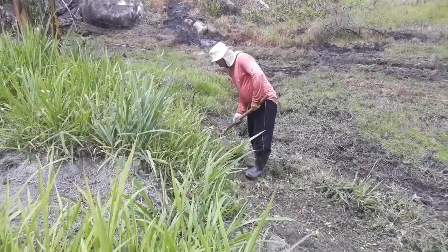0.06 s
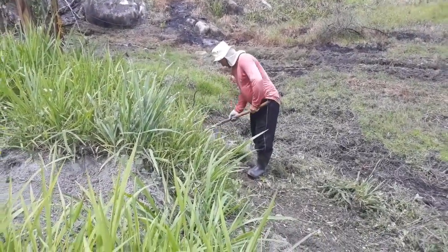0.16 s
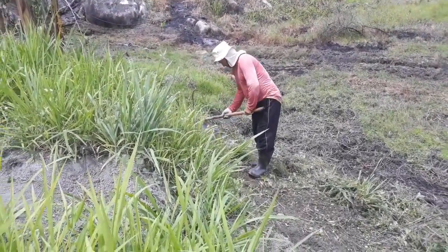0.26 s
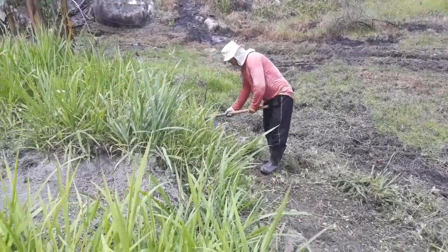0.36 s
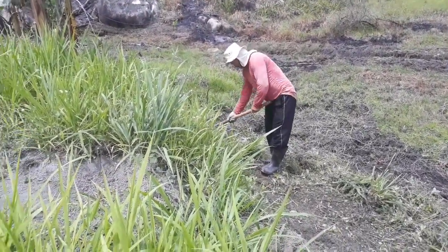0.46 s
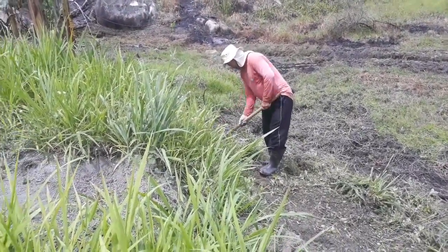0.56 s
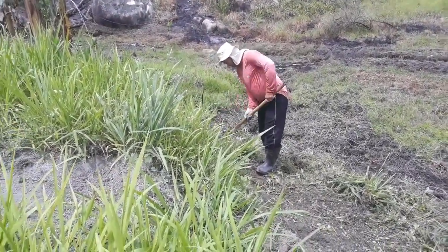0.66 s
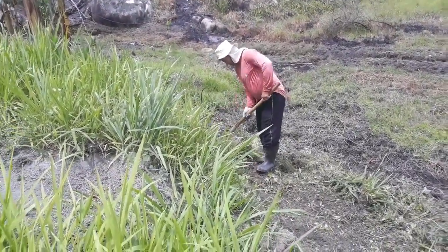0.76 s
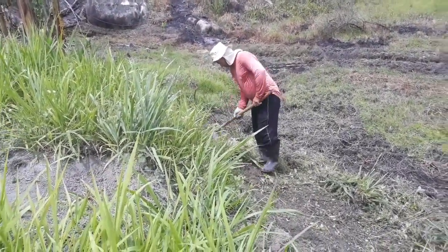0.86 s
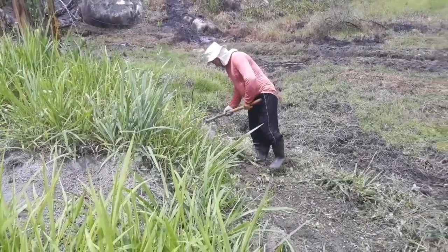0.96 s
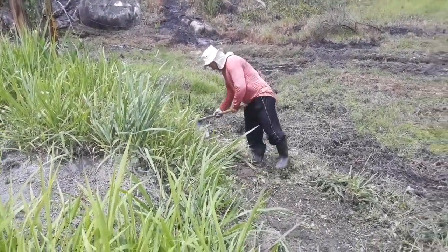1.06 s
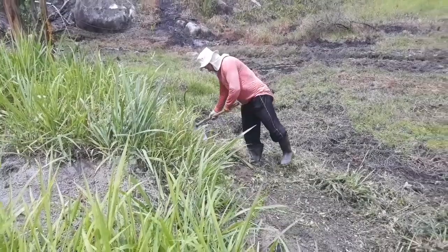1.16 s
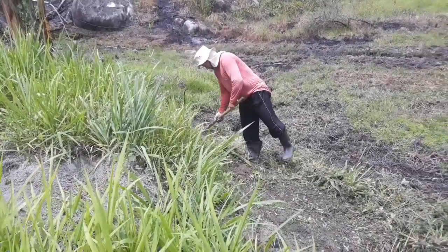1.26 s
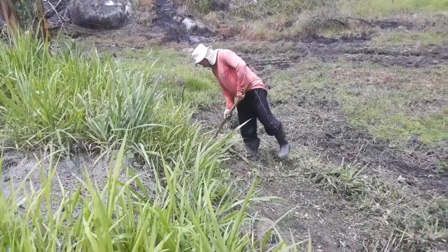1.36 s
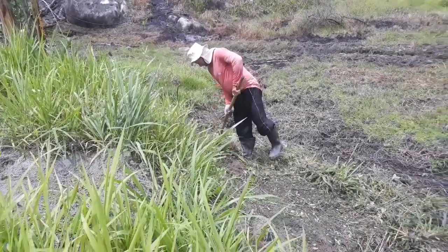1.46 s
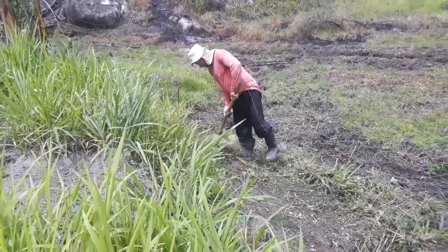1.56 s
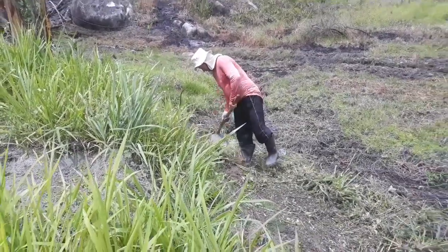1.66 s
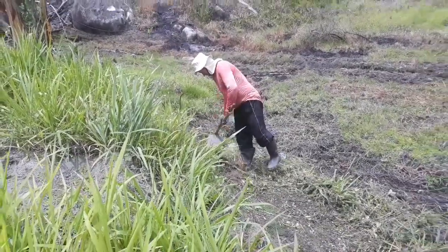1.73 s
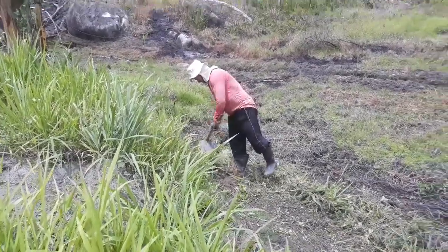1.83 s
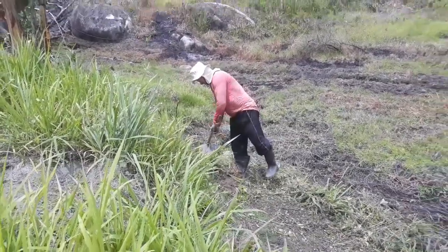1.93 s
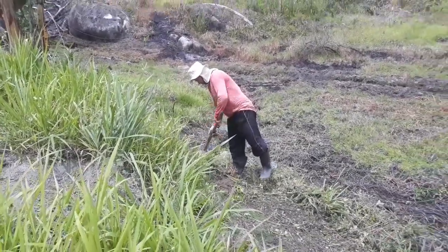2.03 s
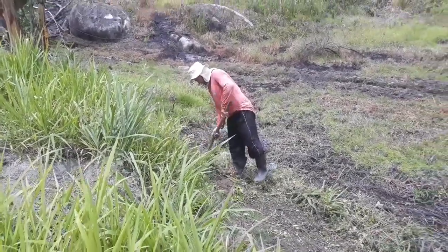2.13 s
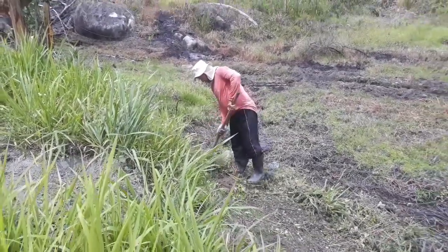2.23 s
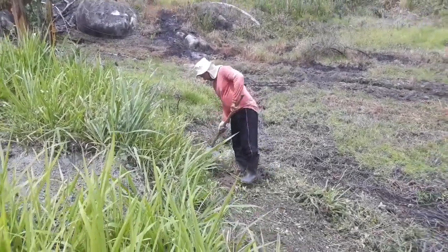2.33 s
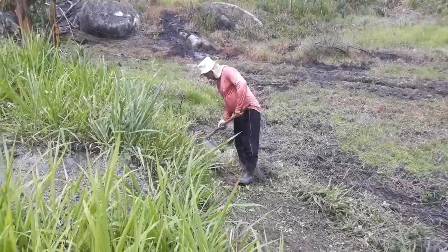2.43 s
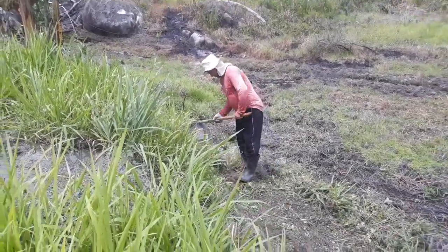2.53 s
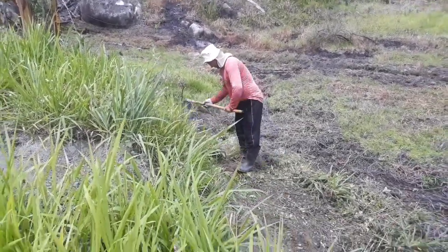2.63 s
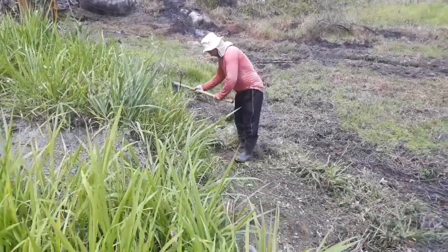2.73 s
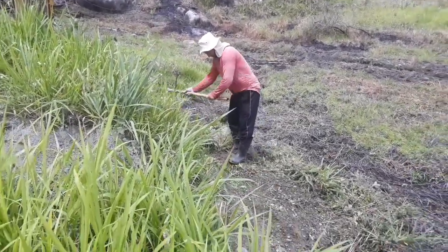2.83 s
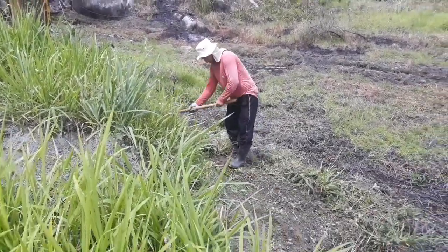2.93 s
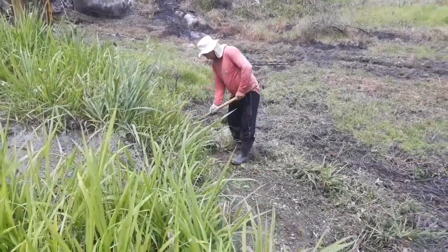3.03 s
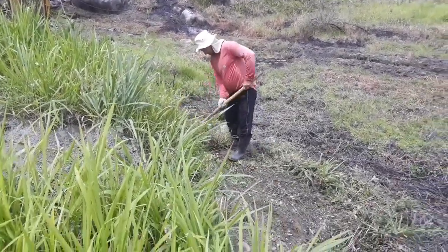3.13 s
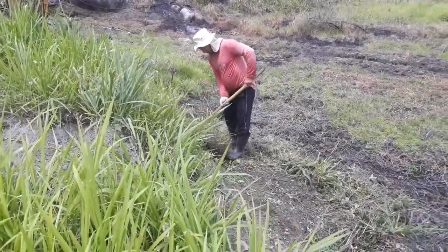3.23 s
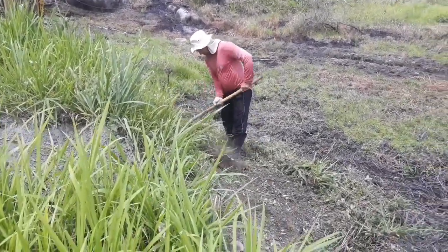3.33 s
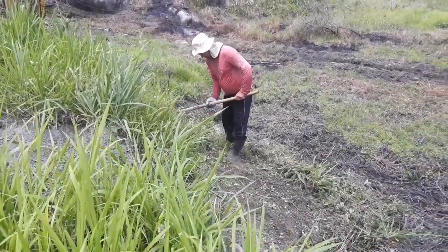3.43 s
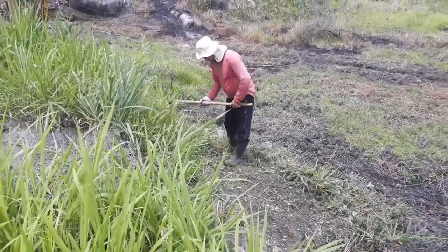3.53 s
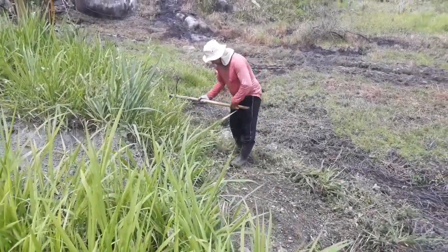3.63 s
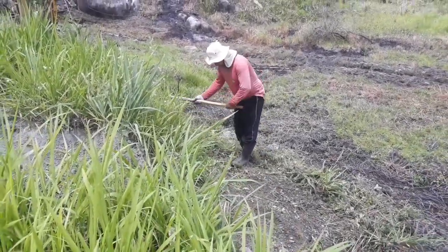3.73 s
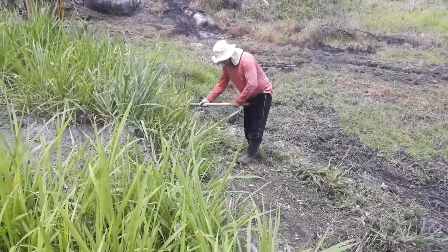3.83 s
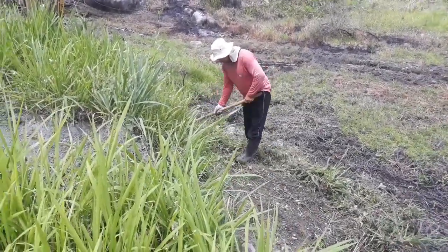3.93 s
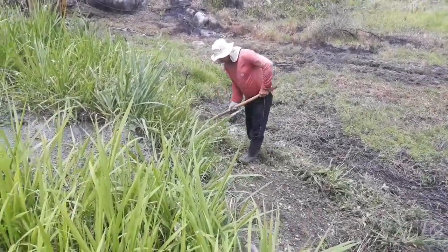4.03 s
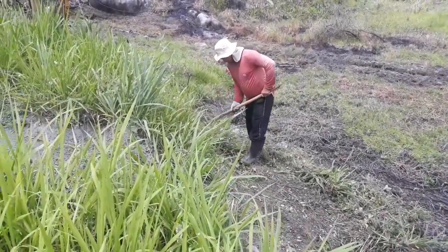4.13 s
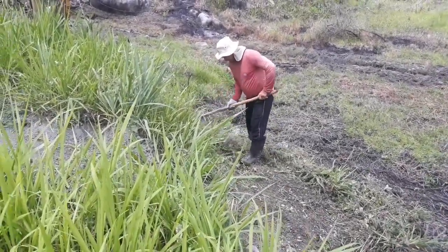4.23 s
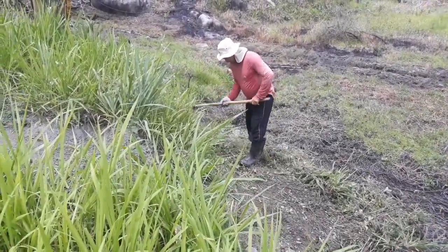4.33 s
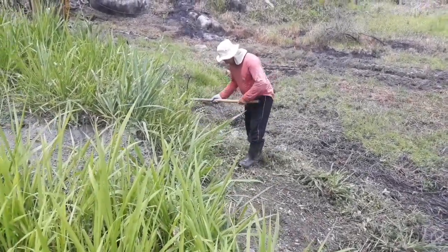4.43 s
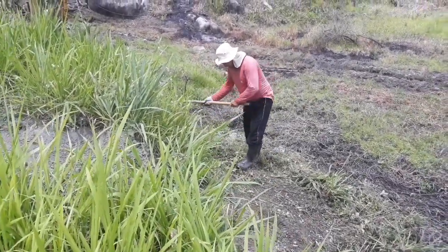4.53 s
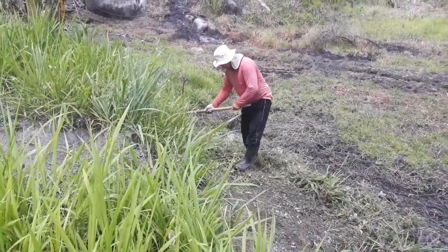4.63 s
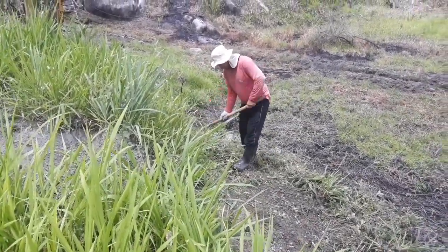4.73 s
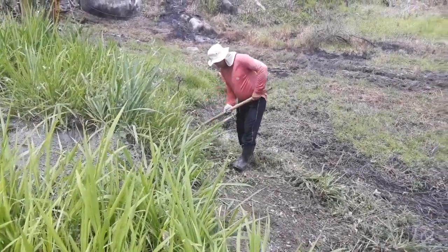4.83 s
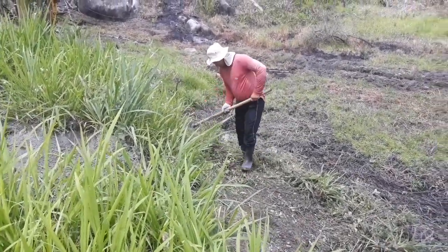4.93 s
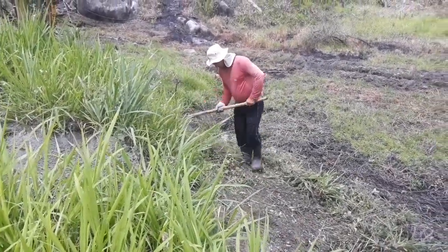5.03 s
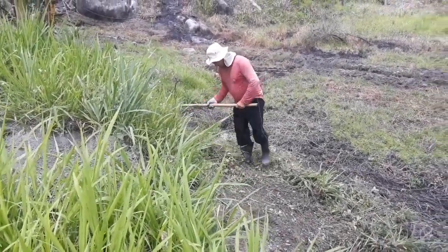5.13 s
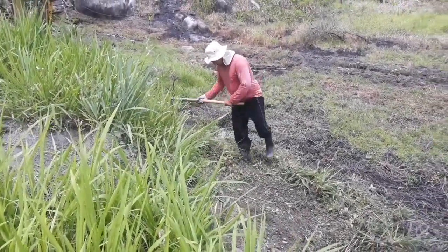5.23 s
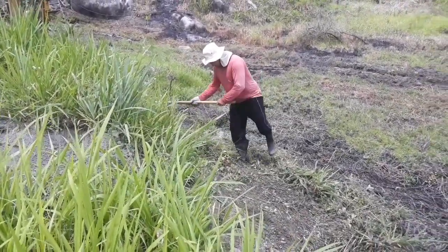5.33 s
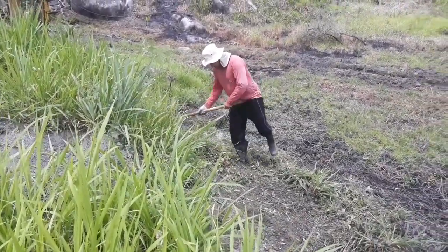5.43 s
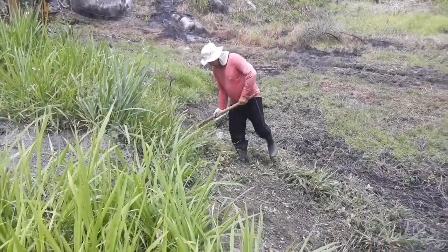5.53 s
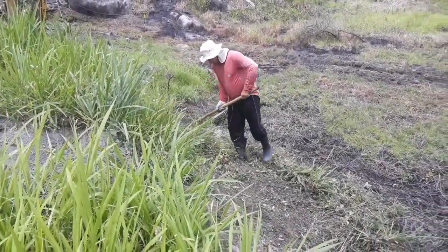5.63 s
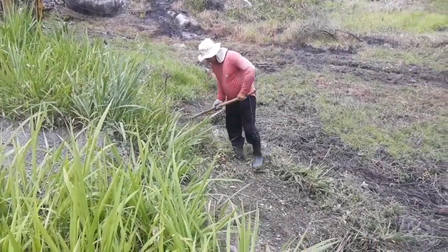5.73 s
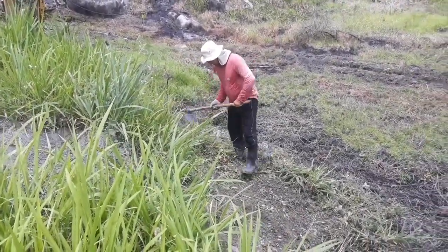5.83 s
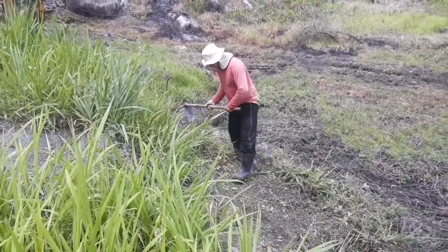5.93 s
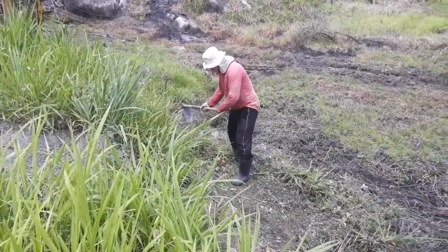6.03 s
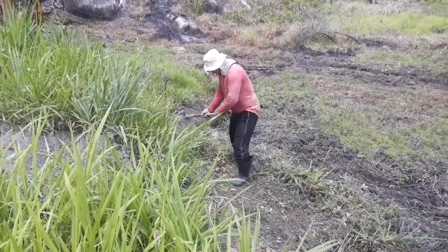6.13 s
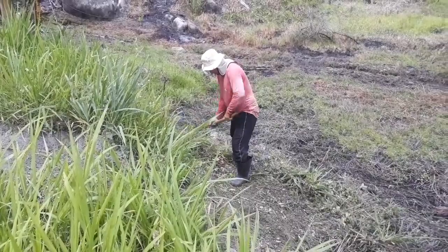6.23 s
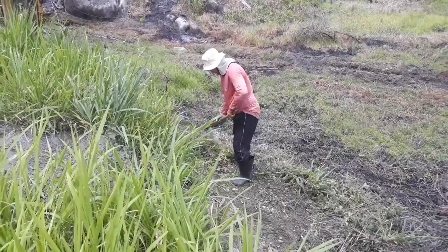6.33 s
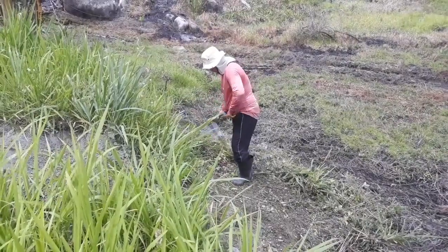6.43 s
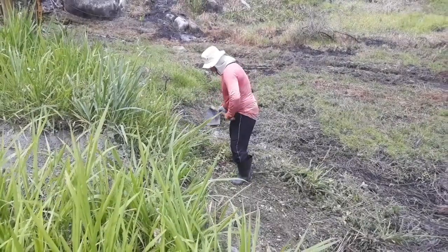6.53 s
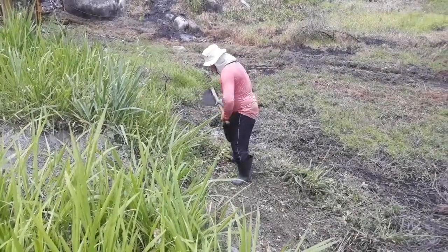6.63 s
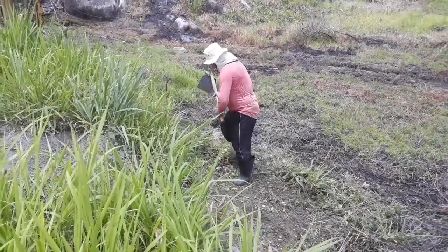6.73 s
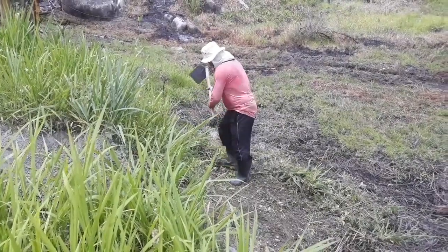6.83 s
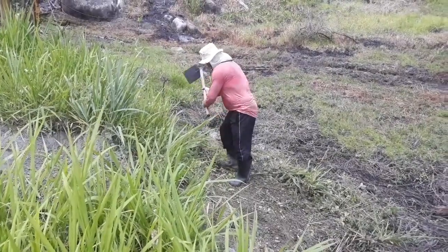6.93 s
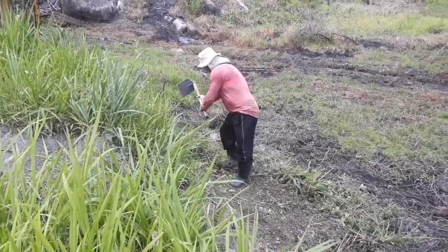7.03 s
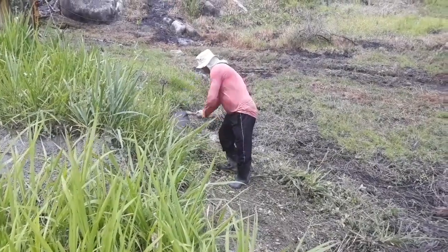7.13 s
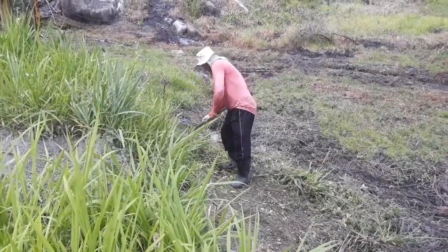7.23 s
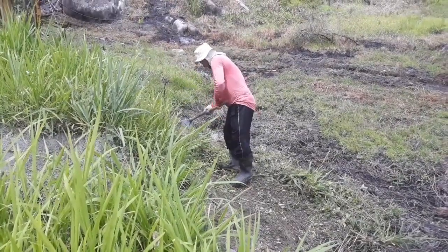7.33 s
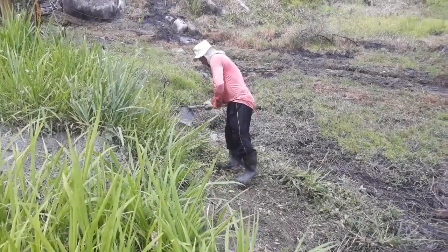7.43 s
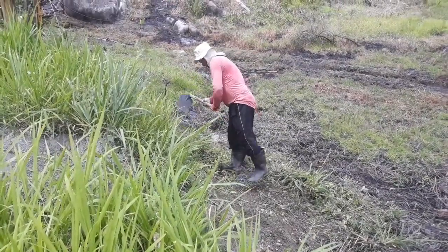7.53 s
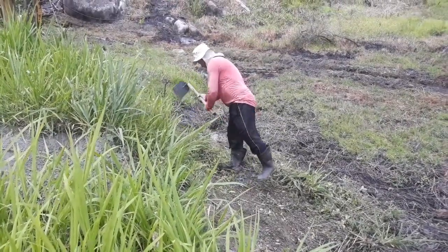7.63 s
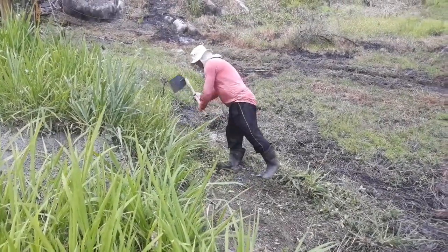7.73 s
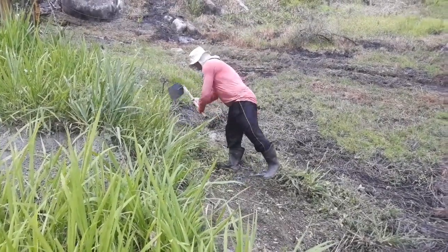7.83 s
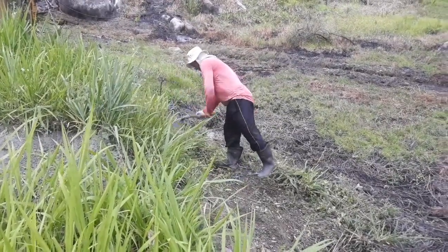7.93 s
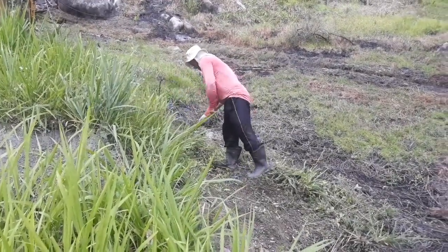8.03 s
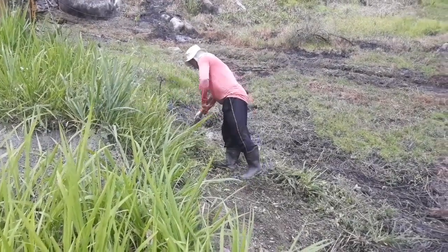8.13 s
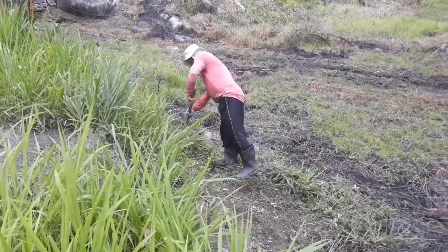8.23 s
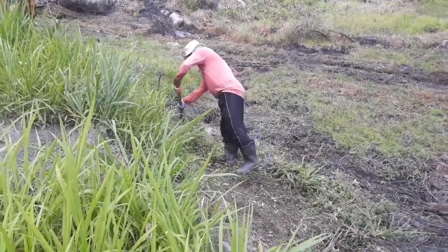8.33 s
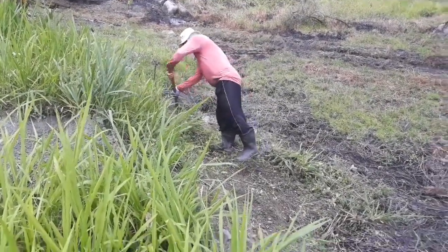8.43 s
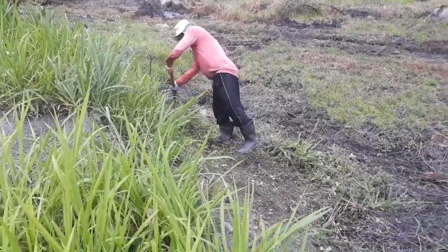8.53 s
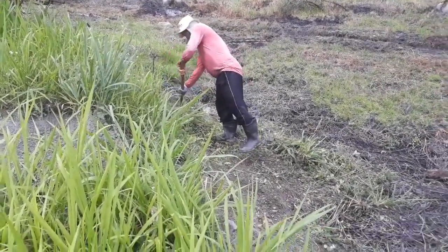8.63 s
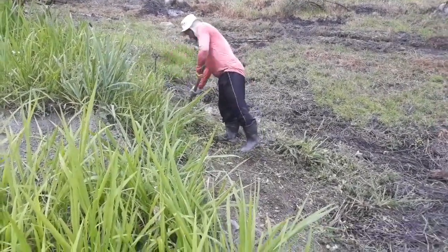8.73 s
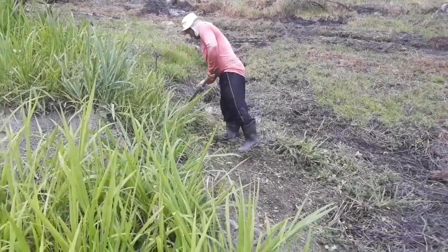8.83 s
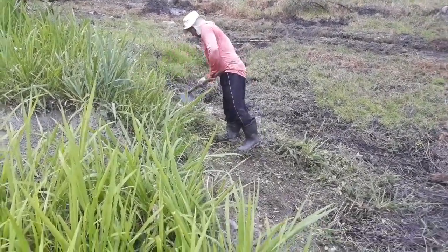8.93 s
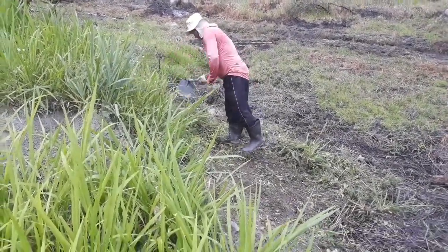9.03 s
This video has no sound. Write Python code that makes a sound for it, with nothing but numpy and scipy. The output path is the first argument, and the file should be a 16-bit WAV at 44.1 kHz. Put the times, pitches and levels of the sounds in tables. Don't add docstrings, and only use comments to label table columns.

```python
import sys
import numpy as np
from scipy import signal
from scipy.fft import rfft, irfft
from scipy.io import wavfile
from scipy.ndimage import uniform_filter1d, map_coordinates

SR = 44100
rng = np.random.default_rng(int(sys.argv[2]) if len(sys.argv) > 2 else 0)


def unload_audio(sound):
    columns = np.transpose(np.atleast_2d(sound))
    steps = np.round(np.clip(columns, -1, 1) * 32767)
    wavfile.write(sys.argv[1], SR, steps.astype(np.int16))


def voltage_ratio(decibels):
    exponent = np.asarray(decibels, float) / 20
    return 10 ** exponent


N = 399525


def along(points, hz):
    f, v = np.transpose(points)
    return np.interp(np.log(hz + 1), np.log(f + 1), v)


def curves(rows):
    s, *cols = np.transpose(rows)
    return [np.interp(np.arange(N) / SR, s, c) for c in cols]


def wobble(rate):
    knots = rng.standard_normal(int(N * rate / SR) + 4)
    return map_coordinates(knots, [np.arange(N) * rate / SR])


def filtered(x, response):
    m = x.shape[-1]
    y = irfft(rfft(x) * response(np.fft.rfftfreq(m, 1 / SR)), m)
    return y / np.sqrt(np.mean(y ** 2, axis=-1, keepdims=True) + 1e-20)


def grit(shape, sparse, spike):
    return rng.standard_normal(shape) * (1 + spike * (rng.random(shape) < sparse))


def resonance(hz, centre, width):
    return 1j * hz * width / (centre ** 2 - hz ** 2 + 1j * hz * width)


def modes(hz, table, lo, hi, scatter_db, wide):
    total = 0
    for k, (centre, width, db) in enumerate(table):
        if lo < centre < hi:
            strength = (-1) ** k * voltage_ratio(db + scatter_db[..., k, None])
            total = total + strength * resonance(hz, centre, width * wide)
    return total


def placed(s, rows):
    at = np.round(s * SR).astype(int) + np.arange(rows.shape[1])
    return np.bincount(at.ravel(), rows.ravel(), N + SR)[:N]


def placed_peaks(s, peak_db, rows):
    return placed(s, voltage_ratio(peak_db) * rows / np.abs(rows).max(axis=1, keepdims=True))


# start_s, grit_peak_db, low_modes_db (re grit), contact_length_s
CUTS = [(0.52, -23.5, -17, 0.018), (0.534, -20.5, -10, 0.024), (0.549, -21, -19, 0.032),
        (1.334, -19, -21, 0.02), (1.351, -14, -18, 0.013), (2.018, -32.5, 0.5, 0.04),
        (2.0553, -36, 3, 0.034), (2.128, -29, -5.5, 0.037), (2.984, -21, -8.5, 0.059),
        (2.997, -24, -5, 0.014), (3.017, -26, -15, 0.027), (3.037, -22, -22, 0.017),
        (3.043, -16, -18, 0.005), (3.937, -21, -20, 0.026), (3.948, -17.5, -14.5, 0.03),
        (3.976, -23.5, -16, 0.064), (3.9925, -21, -27, 0.008), (4.018, -23, -21, 0.0043),
        (4.7194, -19.5, -15.5, 0.048), (5.491, -28, -18, 0.014), (5.501, -16, -19.5, 0.014),
        (5.511, -21, -20, .012), (6.2144, -15, -11.5, 0.015), (6.2375, -24, -3, 0.0088),
        (6.836, -20, -12, 0.013), (6.849, -22.5, -17, 0.022), (7.197, -16, -4, 0.0075),
        (7.204, -18, -4, 0.012), (7.24, -30, 6.5, 0.012), (7.972, -11, -7, 0.022), (8.743, -30, -5, 0.011)]
MORE_CUTS = [(0.566, -30, -14, 0.11), (0.684, -44, 4, 0.017), (1.311, -24.5, -9, 0.081),
             (2.17, -29, -11, 0.047), (2.424, -38, -15, 0.052), (2.894, -38.5, -12.5, 0.073),
             (2.953, -34, -8, 0.07), (2.971, -31, -22, 0.007), (3.056, -27, -24, 0.05),
             (3.1127, -24.5, -27, 0.011), (3.3385, -28.5, -14.5, 0.032), (3.365, -26.5, -22, 0.076),
             (3.389, -22, -23, 0.0067), (3.43, -34, -21, 0.057), (3.89, -38, -15, 0.05),
             (3.919, -30.5, -15, 0.032), (4.25, -32.5, -19, 0.016), (4.31, -53, 0, 0.013),
             (4.754, -27.5, -15, 0.086), (4.854, -33.5, -19, 0.044), (5.525, -24, -11, 0.011),
             (5.5615, -27.5, -13, 0.01), (6.255, -33, -2.5, 0.063), (7.902, -42, -13, 0.027),
             (8.292, -47, -3, 0.046), (8.328, -48.5, 7, 0.025), (8.453, -39.5, -4, 0.02),
             (.502, -53, -22, .02), (6.809, -33, -21, 0.023), (8.7, -43.5, -5.5, 0.13), (8.225, -50, 4, .03)]
# start_s, middle_modes_db, spray_db (both re grit)
STROKES = [(.4, -10, -16), (1.2, -10, -12), (1.9, -13, -10), (2.1, -12, -10), (2.8, -6, -12.5),
           (3.3, -10.5, -8), (3.8, -7.5, -13.5), (4.1, -5, -14), (4.6, -5.5, -14.5), (5.4, -3, -18),
           (6.1, -9.5, -7), (6.7, -18.5, -8.5), (7.1, -14.5, -10.5), (7.8, -14.5, -11), (8.2, -8.5, -25)]
# mode_hz, mode_hz, mode_hz, level_db (re grit)
WOKEN = [(4540, 5370, 4300, -4.5), (4700, 4600, 2970, -11), (4700, 8700, 4700, -6), (4650, 6000, 3300, -22),
         (4700, 3720, 4100, -2), (4480, 24000, 5400, -3), (4230, 5300, 2750, -1.5), (4200, 4670, 2310, -7),
         (4600, 5330, 6570, -7.5), (4300, 4700, 7500, -2), (7460, 8700, 5900, -5), (4750, 5540, 3600, -7),
         (4270, 2970, 5370, 3), (6000, 7880, 8600, -3), (5150, 1700, 3800, -6)]
# at_522_hz_db, at_950_hz_db, at_1100_hz_db
LOW_LEAN = [(4, 3, -3), (3, 2.5, -4.5), (5, 4, 0), (3, 1, 0), (2, 2, -2), (-1, 2, -3), (-2, -1, -8),
            (-1, -2, 1), (2, 2, -6), (4, 4, -5), (2, 6, -1), (-2, 6, -1), (3, 0, -1), (-3, 2, 2), (3, 4, 0)]
# at_1700_hz_db, at_1950_hz_db, at_2400_hz_db, at_2990_hz_db
MID_LEAN = [(4, 2, -2, 2), (1, 0, 0, 4), (1, 0, -1, -3), (3, -2, -1, 0), (-2, 2, 1.5, 6.5), (-2, -2, -3, 4),
            (0.5, 3, 5.5, -1), (0, 0, 4, -1), (2, -1, 3, 2), (-2.5, 3.5, -2, 1), (0, 5.5, -6, 6),
            (2, 3, -8, -3), (3, 0, 0, -2), (1.5, 2, -2, 5), (-3, -2, 0, 2)]
LEANING = [0, 2, 3, 4, 5, 6, 7]
# mode_hz, width_hz, level_db
SHAFT = [(522, 30, -19), (628, 25, -22), (950, 50, -15)]
BLADE = [(1100, 60, 0), (1700, 53, -2), (1950, 38, -1), (2400, 84, -5), (2990, 86, -7), (3740, 43, -9),
         (4470, 100, -5), (4730, 99, -4), (5360, 65, -7), (5670, 64, -7), (6260, 58, -8), (6990, 120, -12),
         (7480, 190, -11), (7880, 70, -10), (8660, 180, -11)]
# frequency_hz, response_db
CRUNCH = [(1800, -77), (2800, 20), (4300, 24), (5600, 18), (7500, 19), (8800, 22.5), (10500, -13)]
# frequency_hz, response_db
SPRAY = [(8000, -95), (9300, -6), (11000, 4), (13500, 7), (15000, 7), (15700, 1)]


def chops():
    s, db, low_db, length = np.transpose(CUTS + MORE_CUTS)[:, :, None]
    begun, mid_db, spray_db = np.transpose(STROKES)
    stroke = np.searchsorted(begun, s) - 1
    mid_db = mid_db[stroke] + 0.48 * (low_db + 3.5)
    spray_db = spray_db[stroke]

    t = np.arange(8192) / SR
    crumble = 0.13 * np.exp(-t / 0.035)
    bite = np.exp(-(t / np.clip(length, 0.002, 0.09)) ** 2.2)
    rise = 1 - np.exp(-t / (0.18 * length))
    press = rise * (bite + crumble)
    force = grit((len(s), len(t)), 0.006, spike=4) * press

    tool = SHAFT + BLADE
    strength_db = rng.normal(0, 2.5, (len(s), len(tool)))
    strength_db[:, LEANING] += np.hstack([LOW_LEAN, MID_LEAN])[stroke[:, 0]]
    low = filtered(force * (bite + 0.3), lambda hz: modes(hz, tool, 0, 1400, strength_db, 1.3))
    mid = filtered(force, lambda hz: modes(hz, tool, 1400, 3300, strength_db, 1.5))
    high = filtered(force, lambda hz: modes(hz, tool, 3300, SR, strength_db, 2))
    crunch = filtered(force, lambda hz: voltage_ratio(along(CRUNCH, hz)))
    spray = filtered(force, lambda hz: voltage_ratio(along(SPRAY, hz)))
    *woken_hz, woken_db = np.transpose(WOKEN)[:, stroke]
    woken = filtered(force, lambda hz: sum(resonance(hz, centre, 75) for centre in woken_hz))

    sound = voltage_ratio(-3.5) * high + voltage_ratio(-1) * crunch + voltage_ratio(woken_db) * woken
    sound = sound + voltage_ratio(spray_db + 6.5) * spray + voltage_ratio(mid_db + 12) * mid + voltage_ratio(low_db + 6.5) * low
    press_rms = np.sqrt(np.mean(press ** 2, axis=1, keepdims=True))
    return placed(s, voltage_ratio(db - 13.5) * press_rms * sound)


# start_s, peak_db, pitch_hz, t60_s
PINGS = [(0.5227, -29, 4650, 0.074), (2.026, -27, 4750, 0.06), (2.078, -27.5, 4650, 0.055),
         (2.901, -30, 4530, 0.1), (2.9287, -31, 4650, 0.22), (2.9547, -24, 4740, 0.35),
         (3.001, -10.5, 4540, 0.056), (4.7594, -27, 5250, 0.099), (4.864, -27.5, 3790, 0.12),
         (6.274, -31.5, 4260, 0.52), (7.2469, -22.5, 4276, 0.14), (7.972, -12, 4280, 0.034)]
KNOCKS = [(.541, -23.5, 975, 0.16), (.546, -15, 1736, 0.076), (1.334, -23, 955, 0.23),
          (2.032, -27, 1720, 0.19), (2.062, -23.5, 1710, 0.13), (2.133, -31, 1670, 0.45),
          (3.958, -13.5, 2850, 0.046), (4.731, -16.5, 1660, 0.078), (5.499, -26.5, 835, 0.31)]
MORE_KNOCKS = [(1.5, -27, 2850, .1), (2.064, -32, 2740, .08), (2.028, -32.5, 522, 0.28), (2.997, -24, 633, .25),
               (2.996, -24, 3000, .15), (3.043, -17, 4450, 0.054), (3.115, -26, 4500, .2),
               (3.37, -36, 2700, .5), (3.36, -30, 8500, .7), (3.95, -22, 1980, 0.087), (3.968, -26, 1292, .12),
               (3.948, -25, 3200, .12), (4.728, -24, 1290, .12), (4.858, -33, 2400, .15),
               (5.501, -23.5, 1280, 0.099), (5.499, -21.5, 1954, .1), (5.501, -20, 3752, .15),
               (6.216, -20, 1940, .1), (6.216, -23, 2700, 0.17), (6.365, -39, 1110, .2), (.64, -36, 930, 0.33)]


def pings(rows):
    s, db, centre, t60 = np.transpose(rows)[:, :, None]
    t = np.arange(8192) / SR
    fade = voltage_ratio(-60 * t / t60) * (1 - np.exp(-t / 0.0011))
    rub = grit((len(s), len(t)), 0.021, spike=2.4) * fade
    tone = filtered(rub, lambda hz: resonance(hz, centre, 90))
    return placed_peaks(s, db - 7.5, tone)


# start_s, peak_db, pitch_hz
SNAPS = [(0.043, -37, 4510), (1.862, -38, 4230), (1.892, -35, 4460), (2.6245, -38.5, 1600),
         (2.846, -43.5, 1590), (3.864, -37.5, 2540), (4.388, -36, 6500), (4.508, -39, 4160),
         (5.3712, -39, 6500), (6.708, -38.5, 2200), (6.772, -36, 5510), (7.081, -37.5, 4600),
         (7.156, -38, 1640), (8.391, -38.5, 2270), (8.552, -45, 6660), (8.698, -39, 2400),
         (0.3674, -40, 4410), (1.8103, -54, 4270), (4.1604, -47, 4700), (4.1994, -40, 4670),
         (4.2872, -40, 7590), (5.3223, -40, 3460), (5.7523, -53, 3000), (6.9396, -38, 3540),
         (8.312, -43, 5150), (5.148, -40, 3600), (5.21, -41, 4570), (2.9018, -43, 6000),
         (3.2575, -35, 4060), (3.157, -29.5, 4500), (7.902, -35, 4730), (3.272, -40, 1200),
         (3.324, -38, 1000), (4.322, -36.5, 1500), (5.068, -43, 2600), (5.195, -45, 5000),
         (5.695, -43, 4470), (8.296, -41.5, 700), (2.065, -31, 4300), (2.187, -35, 4500),
         (0.958, -39, 14000), (1.52, -36, 6540), (3.3015, -28.5, 6000), (3.3448, -31, 7000),
         (4.0884, -31, 12600), (5.618, -32, 7750), (5.643, -33.5, 5500)]
MORE_SNAPS = [
    (1.3357, -25, 5000),
    (2.13, -40, 1100),
    (3.1165, -27.5, 3740),
    (3.3035, -28, 14000),
    (6.295, -37, 8000),
]


def snaps(rows):
    s, db, centre = np.transpose(rows)[:, :, None]
    t = np.arange(2048) / SR
    crack = rng.standard_normal((len(s), len(t))) * np.exp(-t / 0.0052)
    crack = filtered(crack, lambda hz: resonance(hz, centre, 0.55 * centre))
    return placed_peaks(s, db + 1.5, crack)


# start_s, peak_db, pitch_hz, length_s
THUMPS = [(0.191, -49.5, 257, 0.032), (0.537, -36.5, 275, 0.052), (0.567, -43.5, 304, 0.055),
          (1.344, -37, 337, 0.033), (2.03, -49, 535, 0.047), (2.133, -43, 510, 0.065),
          (2.42, -42.5, 316, 0.025), (2.459, -43.5, 260, 0.048), (2.993, -32.5, 627, 0.032),
          (3, -34, 247, 0.039), (3.026, -40, 619, 0.077), (3.354, -40.5, 282, 0.044),
          (3.95, -33, 435, 0.037), (4.736, -35.5, 370, 0.033), (5.503, -36, 326, 0.03),
          (6.055, -48, 271, 0.028), (6.22, -32.5, 540, 0.028), (6.242, -42, 260, 0.053),
          (6.829, -44.5, 263, 0.04), (7.201, -30, 448, 0.011), (7.244, -47, 519, 0.023),
          (7.98, -30, 193, 0.02), (8.055, -44, 90, 0.031), (8.292, -43, 151, 0.028),
          (8.391, -48.5, 255, 0.038), (3.7, -52.5, 210, 0.093), (4.93, -57, 210, .06),
          (8.335, -46.5, 90, 0.028), (8.464, -47, 322, 0.057), (8.739, -50, 360, 0.067),
          (3.016, -48, 152, 0.034),
    (4.74, -43, 120, 0.03),
    (7.213, -36.5, 124, 0.036),
]


def thumps():
    s, db, centre, length = np.transpose(THUMPS)[:, :, None]
    t = np.arange(8192) / SR
    push = t / np.clip(length, 0.004, 0.08) * 2.9
    puff = rng.standard_normal((len(s), len(t))) * push * np.exp(1 - push)

    def hollow(hz):
        low_cut = (1j * hz / (60 + 1j * hz)) ** 2
        high_cut = 1 / (1 + 1j * hz / (2.5 * centre))
        return resonance(hz, centre, 0.9 * centre) * low_cut * high_cut

    return placed_peaks(s, db - 0.5, filtered(puff, hollow))


# most_effort_s, rustle_db, clods_db (both over rest), dying_away_s
PULLS = [(0, 4, -2, 0.47), (.7, 6.5, -1, 0.39), (1.5, 7, -0.5, 0.33), (1.7, -0.5, 5.5, 0.2),
         (2.25, 7, 8.5, 0.17), (3.15, 11, -29, 0.038), (3.3, 8, 4.5, 0.44), (4.16, 4, 8.5, 0.14),
         (4.33, 4.5, 11.5, 0.11), (4.95, 3.5, 4.5, 0.15), (5.75, 2.5, -2.5, 1), (6.6, 1.5, 4, 0.68),
         (7.25, 1, 12, 0.1), (8.2, 2, 1.5, 0.11), (8.43, 0.5, 9, 0.032)]


def effort():
    peak_s, rustle_db, clods_db, fade = np.transpose(PULLS)[:, :, None]
    late = np.arange(N) / SR - peak_s
    build = np.exp(-(late / 0.13) ** 2)
    die = np.exp(-np.abs(late) / np.clip(fade, 0.03, 1))
    shape = np.where(late < 0, build, die)
    return np.hstack([rustle_db, clods_db]).T @ shape


# rustle_db, clods_db, spray_db
REST_DB = (-53, -67, -62.5)


def crackle(pull_db):
    when, pitch, size = rng.random((3, 260, 1))
    t = np.arange(1024) / SR
    centre = 4300 * np.exp(1.6 * (pitch - 0.5))
    rasp = rng.standard_normal((len(when), len(t))) * t * np.exp(-t / 0.0022)
    rasp = filtered(rasp, lambda hz: resonance(hz, centre, 0.5 * centre))
    return voltage_ratio(REST_DB[0] - 6 + pull_db) * placed(when * N / SR, voltage_ratio(-12 * size) * rasp)


def patchy(x, depth_db):
    z = signal.stft(x, nperseg=512)[2]
    patches = uniform_filter1d(rng.standard_normal(z.shape), size=7, axis=0)
    patches = uniform_filter1d(patches, size=6, axis=1)
    return signal.istft(z * voltage_ratio(depth_db * patches / patches.std()), nperseg=512)[1][:N]


# frequency_hz, response_db
REEDS = [(71, -18.5), (120, -4), (260, -21.5), (600, -21.5), (1200, -5.5), (1670, -11.5), (1840, -6.5),
         (2400, -3.5), (3840, -5.5), (4530, -0.5), (6140, -7), (7850, -4.5), (9620, -12.5), (14200, -12),
         (15700, -19)]
# frequency_hz, response_db
CLODS = [(90, -31), (180, -6), (280, -8), (600, -14), (900, -8), (1500, -46)]


def drag():
    pull_db, clod_db = effort()
    rustle_db, clods_db = REST_DB[0] + pull_db, REST_DB[1] + clod_db
    spray_db = REST_DB[2] + 1.46 * pull_db
    force = grit(N, 0.0018, spike=3) * voltage_ratio(0.8 * wobble(30) + 1.3 * wobble(70))
    force = patchy(force, depth_db=1.3)
    leaves = filtered(force, lambda hz: voltage_ratio(along(REEDS, hz)) * np.clip((10500 - hz) / 1600, 0, 1))
    blade = filtered(force, lambda hz: modes(hz, BLADE, 0, SR, np.zeros(len(BLADE)), 2.4))
    spray = filtered(force, lambda hz: voltage_ratio(along(SPRAY, hz)))
    tumble = rng.standard_normal(N) * voltage_ratio(1.5 * wobble(25) + wobble(4))
    clods = filtered(tumble, lambda hz: voltage_ratio(along(CLODS, hz)))
    stirred = np.clip((rustle_db + 52) / 8, 0, 1)
    rustle = voltage_ratio(rustle_db) * (voltage_ratio(-0.5) * leaves + voltage_ratio(-21) * stirred * blade)
    return rustle + voltage_ratio(spray_db) * spray + voltage_ratio(clods_db) * clods + crackle(pull_db)


# set_free_s, main_mode_rms_db, fading_db_per_s, damped_again_s
FREED = [(.79, -58, 0, 1), (2.87, -58, 0, 2.97), (3.03, -50.5, 25, 3.42), (4, -56, 35, 4.45),
         (4.78, -55, 24, 5.48), (5.54, -53, 33, 5.95), (6.355, -53.5, 35, 6.66), (7.24, -44, 30, 7.9),
         (7.33, -50, 40, 7.6), (5.55, -49.5, 20, 5.618)]
# mode_hz, level_db
FREE = [
    (1948, 2),
    (1260, -15.5),
]


def ring():
    t = np.arange(N) / SR
    size = 0
    for s, db, fade_db, end in FREED:
        gate = np.clip(np.minimum((t - s) / 0.02, (end - t) / 0.0076), 0, 1)
        size = size + voltage_ratio(db - fade_db * np.abs(t - s)) * gate
    tone = 0
    for hz, db in FREE:
        drift = 0.7 * wobble(10) + 0.35 * wobble(45)
        tone = tone + voltage_ratio(db + 2 + 1.4 * wobble(14)) * np.sin(2 * np.pi * hz * t + drift)
    return size * tone


def whistle(rows, edge=0.0043):
    hz, db = curves(rows)
    t = np.arange(N) / SR
    gate = np.clip(np.minimum(t - rows[0][0], rows[-1][0] - t) / edge, 0, 1)
    return 2 * np.pi * np.cumsum(hz) / SR, np.sqrt(2) * voltage_ratio(db) * gate


# time_s, pitch_hz, rms_db
FAR = [
    (0.22, 2130, -63),
    (0.29, 2440, -62),
    (0.44, 2420, -62),
]
FLICKS = [
    [(.735, 1790, -59), (.768, 1990, -54), (.797, 2330, -50), (.81, 2600, -52), (.832, 2790, -58)],
    [(3.285, 2050, -62), (3.305, 2410, -50), (3.335, 2680, -58)],
    [(7.744, 1980, -51), (7.761, 2480, -48.5), (7.79, 2650, -52.5), (7.815, 2980, -66)],
]
# start_s, length_s, final_rms_db, swell_db
RISES = [
    (0.881, .175, -43.5, 20),
    (3.39, 0.16, -49, 14),
    (7.855, .125, -52.5, 3),
]
# start_hz, end_hz
RISE_HZ = (1650, 2010)
# time_s, pitch_hz, rms_db
HOLDS = [
    [(1.052, 2400, -44), (1.06, 2400, -40.5), (1.12, 2426, -40), (1.2, 2472, -45), (1.296, 2529, -44.5),
     (1.308, 2540, -54)],
    [(3.548, 2424, -47), (3.556, 2426, -40), (3.584, 2425, -38), (3.7, 2513, -42.5), (3.76, 2523, -40.5),
     (3.772, 2530, -49)],
    [(7.978, 2340, -41), (8.04, 2347, -41), (8.09, 2370, -45), (8.184, 2449, -40.5), (8.244, 2481, -43),
     (8.259, 2620, -51)],
]


def bird():
    rises = []
    for s, length, db, swell_db in RISES:
        rises.append([(s, RISE_HZ[0], db - swell_db), (s + length, RISE_HZ[1], db)])
    notes = map(whistle, [FAR] + FLICKS + rises + HOLDS)
    return sum(size * np.sin(phase) for phase, size in notes) * voltage_ratio(1.5 * wobble(40))


# time_s, wingbeat_hz, rms_db
FLY = [
    (4.235, 217.3, -60),
    (4.3, 214.6, -59.5),
    (4.36, 216, -54.5),
    (4.41, 204.5, -62),
    (4.44, 200, -72),
]
# multiple, level_db
WINGS = [(1, 5), (2, 3), (3, -33), (4, -2.5), (5, 0), (6, -5), (7, -20), (8, -8), (9, -24)]


def fly():
    phase, size = whistle(FLY, edge=0.037)
    phase = phase + 0.16 * wobble(70)
    return size * sum(voltage_ratio(db + 2.5 * wobble(30)) * np.cos(k * phase) for k, db in WINGS)


# time_s, pitch_hz, rms_db
SUCK = [
    (8.5, 196, -65),
    (8.542, 237, -45.5),
    (8.58, 223, -82),
]


def mud():
    phase, size = whistle(SUCK, edge=0.0072)
    return size * np.sin(phase)


# centre_hz, width_hz, rms_db
POND = (1675, 148, -60.5)


def frogs():
    centre, width, db = POND
    lumps = rng.standard_normal(N) * voltage_ratio(1.8 * wobble(2.5) + 3 * wobble(55))
    return voltage_ratio(db) * filtered(lumps, lambda hz: np.exp(-((hz - centre) / width) ** 2))


# time_s, buffet_db
WIND = [(0.0, -74), (1.97, -77), (2.37, -76), (2.85, -74.5), (4.92, -74), (5.85, -78), (7.09, -71),
        (7.65, -66), (7.87, -73), (8.1, -63.5), (8.53, -70), (9.06, -71)]
# frequency_hz, response_db
RUMBLE = [(15, -50), (30, -15), (70, 11), (130, 4), (300, -56)]


def wind():
    lumps = rng.standard_normal(N) * voltage_ratio(3.5 * wobble(11))
    return voltage_ratio(curves(WIND)[0]) * filtered(lumps, lambda hz: voltage_ratio(along(RUMBLE, hz)))


# frequency_hz, t60_s
FIELD = [(1200, 0.65), (2500, 0.87), (9000, 0.012)]


def field(x):
    hz, t, z = signal.stft(rng.standard_normal(SR // 2), SR, nperseg=256)
    fade = voltage_ratio(-60 * t / along(FIELD, hz)[:, None])
    tail = signal.istft(z * fade, SR, nperseg=256)[1]
    delayed = np.pad(x, (600, 0))
    return signal.fftconvolve(delayed, tail / np.linalg.norm(tail))[:N]


def scene():
    hoe = chops() + pings(PINGS + KNOCKS) + snaps(SNAPS)
    song = bird()
    echo = field(voltage_ratio(-26) * hoe + voltage_ratio(-21) * song)
    ground = thumps() + drag() + ring() + mud()
    around = frogs() + fly() + wind()
    return (hoe + song + echo + ground + around + pings(MORE_KNOCKS) + snaps(MORE_SNAPS))[None]


def low_pass(x):
    return signal.sosfilt(signal.butter(12, 16650, fs=SR, output="sos"), x)


def record(dry):
    dry = dry / (1 + np.abs(dry / 0.3) ** 3) ** (1 / 3)
    above_limit = np.fft.rfftfreq(N, 1 / SR) > 15620
    top = irfft(rfft(dry) * above_limit, N)
    level = np.sqrt(np.abs(uniform_filter1d(dry ** 2, size=400, axis=1)))
    leak = voltage_ratio(-37) * top * np.clip(level / 0.05, 0, 1) ** 3
    return low_pass(dry - top + leak)


dry = scene()
out = record(dry)
unload_audio(out)
```